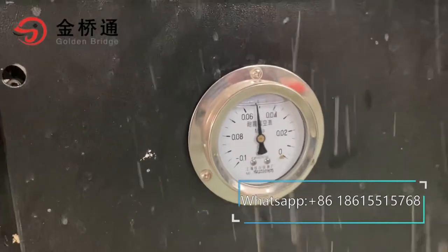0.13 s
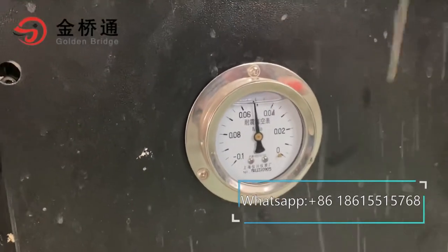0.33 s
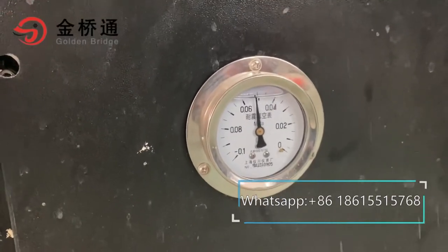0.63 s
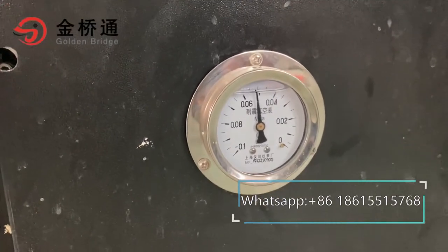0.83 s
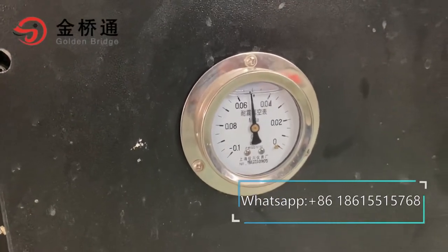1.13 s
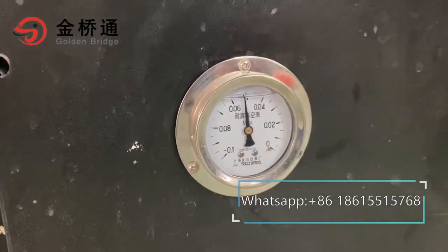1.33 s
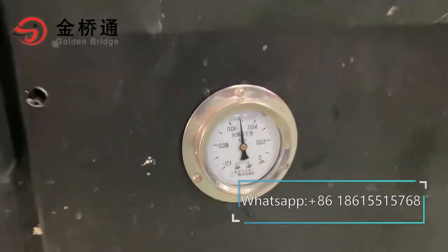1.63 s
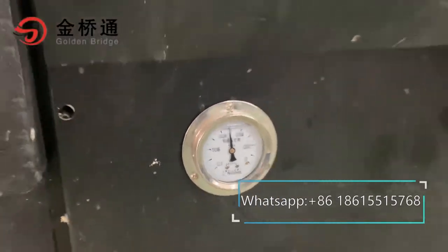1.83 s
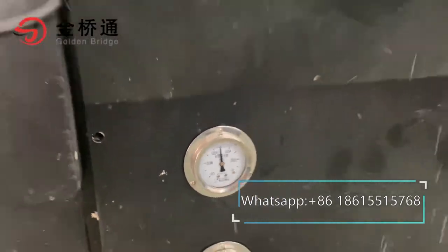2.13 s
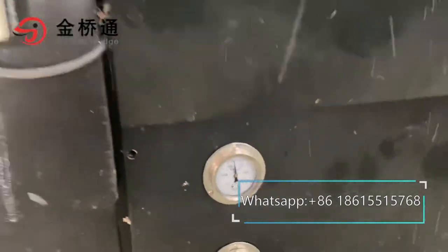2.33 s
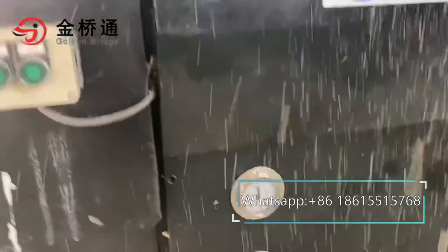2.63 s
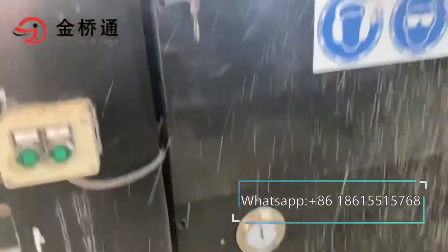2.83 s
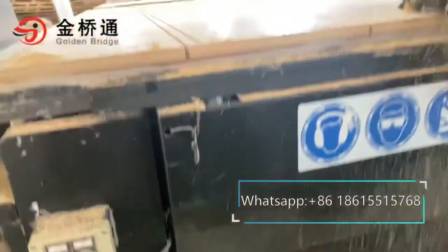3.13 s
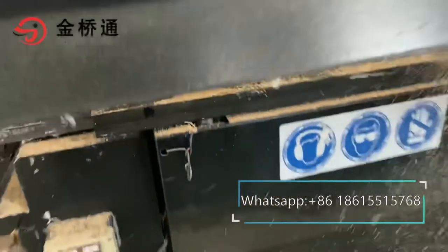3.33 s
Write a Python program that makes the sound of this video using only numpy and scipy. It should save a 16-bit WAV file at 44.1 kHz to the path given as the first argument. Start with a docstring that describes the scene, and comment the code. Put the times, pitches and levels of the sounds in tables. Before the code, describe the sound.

Steady machine roar in a workshop: rumbling pump, piercing spindle whine and raspy, hissing chip cutting.

```python
"""In a workshop, a vacuum pump rumbles beside a machine whose fast spindle throws chips.
Pump and spindle tones are sines with wavering reflections; the spindle's fan sings on its sixth multiple.
The electric drive whistles in thin lines over the rasp and hiss of the cut, which are shaped noise.
The microphone pair starts at the cabinet's gauge, then backs off and rises through loud spots of the tones."""
import sys
import numpy as np
from scipy import signal
from scipy.io import wavfile
from scipy.ndimage import uniform_filter1d

SR = 44100
rng = np.random.default_rng(int(sys.argv[2]) if len(sys.argv) > 2 else 0)


def inscribe(sig):
    """Save sig as 16-bit PCM at rate SR to the path in sys.argv[1].

    A 1-D sig is mono; a 2-D sig holds one channel per row.
    Samples are clipped to [-1, 1] before scaling.
    """
    pcm = np.round(np.clip(np.atleast_2d(sig).T, -1, 1) * 32767)
    wavfile.write(sys.argv[1], SR, pcm.astype(np.int16))


N = 154350

# The microphone pair. Each row: frequency in Hz, likeness of the two sides (0-1),
# lead of the left in radians, left minus right in dB.
MICROPHONE_PAIR = [(80, 0.94, -0.2, -1.4), (300, 0.89, -0.2, -1.4), (450, 0.42, -0.2, -0.2),
                   (650, 0.94, -1.1, -0.9), (800, 0.72, -1.6, -0.0), (930, 0.58, -2.6, -1.2),
                   (1080, 0.15, -2.9, -1.9), (1250, 0.42, 1.0, -6.6), (1550, 0.52, 0.4, -5.8),
                   (1900, 0.73, 0.2, -2.0), (2250, 0.65, -0.0, -1.6), (2700, 0.2, 1.4, 0.6),
                   (3600, 0.52, 0.1, 0.9), (4300, 0.56, 0.2, 1.1), (5200, 0.24, 0.5, 2.6),
                   (6500, 0.82, 0.0, -0.4), (7400, 0.46, -1.2, 0.8), (8400, 0.92, -3.2, 0.1),
                   (9100, 0.52, -4.7, -0.4), (10000, 1.0, -6.3, -0.0), (11100, 0.34, -7.6, -0.1),
                   (12100, 0.95, -9.4, 0.0), (13000, 0.2, -11.6, -0.2), (13800, 0.99, -12.6, -0.0),
                   (15000, 0.14, -14.3, -0.0), (15600, 0.93, -15.7, -0.0)]
# Spindle speed. Each row: time in seconds, turns per second.
SPINDLE_SPEED = [(0, 299.7), (1.6, 299.75), (2.2, 298.95), (2.7, 299.3), (3.1, 299.15), (3.5, 298.85)]
# Spectrum of the cutting hiss. Each row: frequency in Hz, dB per Hz before any level curve.
HISS_SPECTRUM = [(2500, -77), (3000, -66), (3300, -65.5), (3900, -66), (4400, -69.5), (5000, -70),
                 (6000, -72), (6400, -73), (7500, -72), (7950, -65.5), (8300, -77.5), (9800, -71.5),
                 (11800, -78.5), (12600, -88), (15600, -85), (17000, -108)]


def amp(db):
    """Decibels to gain."""
    return 10 ** (np.asarray(db) / 20)


def evened(x):
    """Scales to rms 1."""
    return x / np.sqrt(np.mean(abs(x) ** 2) + 1e-20)


def curve(points, t=None, axis=1):
    """One column of a time table, joined by straight lines."""
    table = np.transpose(points)
    if t is None:
        t = np.arange(N) / SR
    return np.interp(t, table[0], table[axis])


def read(points, hz):
    """All columns of a frequency table, joined by straight lines on a log axis."""
    f, *columns = np.transpose(points)
    return [np.interp(np.log(hz + 1), np.log(f + 1), column) for column in columns]


def drift(rate_hz, count=512):
    """Slow complex random wander of rms 1, its spectrum falling to half at rate_hz."""
    f = np.fft.fftfreq(count, N / SR / count)
    chance = rng.standard_normal(count) + 1j * rng.standard_normal(count)
    slow = np.fft.ifft(chance / (1 + (f / rate_hz) ** 2))
    return np.interp(np.linspace(0, count - 1, N), np.arange(count), evened(slow))


def sides(pan_db):
    """Left and right gains of constant power."""
    gains = np.array([amp(pan_db / 2), amp(-pan_db / 2)])
    return gains / np.sqrt((gains ** 2).mean(0))


def tone(hz, db, waver, rate_hz, place=None):
    """A line plus its wavering reflections at the two microphones; place = (balance dB, lead radians)."""
    if place is None:
        _, lead, balance = read(MICROPHONE_PAIR, np.mean(hz))
    else:
        balance, lead = place
    shared, apart = drift(rate_hz), drift(rate_hz)
    reflections = shared + 0.45 * np.array([apart, -apart])
    pair = (1 + waver * reflections) / np.sqrt(1 + waver ** 2)
    pair[0] *= np.exp(1j * lead)
    turns = np.cumsum(hz * np.ones(N)) / SR + rng.random()
    wave = (pair * np.exp(2j * np.pi * turns)).real
    return np.sqrt(2) * amp(db) * wave * sides(balance).reshape(2, -1)


def spot(usual_db, spots):
    """Level in dB as the microphone passes through loud spots (dB, s, half length s), added as power."""
    t = np.arange(N) / SR
    loud = sum(amp(db) ** 2 * np.exp(-abs((t - when) / half) ** 3) ** 2 for db, when, half in spots)
    return 10 * np.log10(amp(usual_db) ** 2 + loud)


def wash(spectrum, level, patchy_db, flicker_db, size):
    """Turbulent noise with drifting patches and a shared flicker, at the two microphones."""
    overlap = size - size // 4
    white = rng.standard_normal((2, N)) * np.sqrt(SR / 2)  # 0 dB per Hz
    hz, t, (a, b) = signal.stft(white, SR, nperseg=size, noverlap=overlap)
    same, lead, balance = read(MICROPHONE_PAIR, hz[:, None])
    same = np.clip(same, 0, 1)
    left = a * np.exp(1j * lead)
    right = same * a + np.sqrt(1 - same ** 2) * b
    pair = np.array([left, right]) * sides(balance)
    # patches spread over neighbouring pitches and moments; the flicker takes all pitches together
    patches = uniform_filter1d(rng.standard_normal(a.shape), size=5, axis=0)
    patches = evened(uniform_filter1d(patches, size=24, axis=1))
    flicker = evened(uniform_filter1d(rng.standard_normal(len(t)), size=3))
    level_db = read(spectrum, hz[:, None])[0] + curve(level, t)
    pair *= amp(level_db + patchy_db * patches + flicker_db * flicker)
    return signal.istft(pair, nperseg=size, noverlap=overlap)[1][:, :N]


def pump():
    """Beating low tones over the rumble, and the hollow roar of the cabinet."""
    # Each row: frequency in Hz, dB before the level curve.
    pump_tones = [(67.5, -45.5), (81, -53.5), (99.8, -39), (104, -43.5), (119, -42.5), (247, -45.5),
                  (328, -49)]
    # Each row: time in seconds, dB added to every pump tone.
    tone_level = [(0, -2.5), (.8, 3.5), (2.1, 0.5), (2.35, -4), (3.5, -4)]
    # Spectra of the rumble and the roar. Each row: frequency in Hz, dB per Hz before the level curve.
    rumble_spectrum = [(8, -102), (25, -85), (45, -81), (68, -51), (90, -53.5), (112, -52.5), (150, -54.5),
                       (200, -107.5)]
    roar_spectrum = [(140, -71), (185, -60), (280, -64.5), (330, -57.5), (450, -64.5), (540, -60),
                     (660, -50), (760, -62.5), (880, -63.5), (1150, -105)]
    # Their levels. Each row: time in seconds, dB added to the spectrum.
    rumble_level = [(0, -5), (.1, 0), (1.1, -3), (1.65, 1), (2.25, -2.5), (2.42, -9), (3.5, -17)]
    roar_level = [(0, 1.5), (0.8, -2), (1.2, 0), (1.9, 1.5), (2.15, 4), (2.5, -0.5), (2.85, -1.8),
                  (3.5, -3)]
    tones = sum(tone(hz, db + curve(tone_level), waver=0.36, rate_hz=6.3) for hz, db in pump_tones)
    rumble = wash(rumble_spectrum, rumble_level, patchy_db=1.8, flicker_db=1.5, size=2048)
    roar = wash(roar_spectrum, roar_level, patchy_db=1, flicker_db=0.5, size=2048)
    return tones + amp(-3.0) * rumble + roar


def spindle():
    """Multiples of the turning speed; the fan's blade tone is the loudest and shifts between microphones."""
    # The third multiple and the fan tone.
    # Each row: time in seconds, level in dB, left minus right in dB, lead of the left in radians.
    third_path = [(0, -54, 1.2, -1), (1.05, -48.5, 3, -2), (1.2, -36, 5.5, -3), (1.7, -30.5, -2, -2),
                  (1.85, -31.5, -1.4, -2.0), (1.93, -44, -5, -2.5), (2.05, -33.5, -1, -4),
                  (2.35, -28.5, 0.5, -3), (2.59, -51, 14, -2), (2.74, -54, 7, -3), (2.85, -38, -6.4, -5.5),
                  (3.1, -43.3, -5, -6), (3.35, -37.5, -3, -6), (3.5, -34.5, -2.5, -4.5)]
    fan_path = [(0, -25.8, 1.0, 1.4), (0.1, -24.8, -2.4, 1.1), (0.25, -24.0, -0.0, 1.0),
                (0.42, -25.1, 9.1, 1.1), (0.8, -23.9, 7.3, 0.7), (1.35, -22.9, 1.8, 1.1),
                (1.72, -26.1, 2.8, 1.1), (1.95, -22.3, 5.3, 0.9), (1.985, -24.8, 4.5, 2.4),
                (2.02, -21.4, 7.8, 0.6), (2.3, -18.1, -7.0, 0.6), (2.44, -18.3, -3.1, 0.1),
                (2.68, -22.2, -2.9, 0.2), (2.86, -17.5, -0.1, -0.4), (2.95, -21.5, -0.4, -0.7),
                (3.06, -33, -0.8, -1.1), (3.11, -28, 1.5, -1.2), (3.15, -30, 1.0, -1.2),
                (3.2, -23.7, -4.4, -0.8), (3.31, -23.2, -3.0, -0.4), (3.39, -31.6, -1.0, -0.6),
                (3.5, -29.8, -2.4, -0.5)]
    # First and second multiples, heard once clear of the cabinet. Each row: time in seconds, level in dB.
    first_level = [(0, -51), (1.95, -48), (1.99, -33), (2.3, -30), (2.55, -28), (2.85, -32), (2.92, -42),
                   (3.0, -32.5), (3.5, -41)]
    second_level = [(0, -59), (1.5, -43), (2.08, -42), (2.2, -27), (2.45, -28.5), (2.621, -25), (2.87, -27),
                    (2.94, -40), (3.08, -34.5), (3.16, -26), (3.5, -34.5)]
    # Higher multiples, a row for each loud spot. Each row: multiple of the speed, usual level in dB,
    # dB of the loud spot, its time in seconds, its half length in seconds.
    overtone_spots = [(4, -59, -37, 2.21, 0.27), (4, -68, -44.5, 3.25, 0.26), (5, -80, -34.5, 2.3, 0.46),
                      (5, -63, -40, 3.1, 1), (7, -46, -36, 2.65, 0.39), (7, -70, -34.5, 3.29, 0.34),
                      (8, -53.5, -42, 1.53, 0.28), (9, -51, -40.5, 1.8, 0.75), (12, -52, -36.5, 0.066, 0.6),
                      (12, -55, -39, 1.73, 0.13), (15, -71, -39, 1.77, 0.15),
                      (18, -54.5, -41.5, 1.43, 0.27), (18, -67, -38, 1.695, .14)]
    blades = 6
    speed = curve(SPINDLE_SPEED)
    sound = np.zeros((2, N))
    for multiple, path in [(blades // 2, third_path), (blades, fan_path)]:
        place = (curve(path, axis=2), curve(path, axis=3))
        sound += tone(multiple * speed, curve(path), waver=0.1, rate_hz=20, place=place)
    for multiple, level in [(1, first_level), (2, second_level)]:
        sound += tone(multiple * speed, curve(level), waver=0.17, rate_hz=14)
    for multiple, usual_db, *loud_spot in overtone_spots:
        sound += tone(round(multiple) * speed, spot(usual_db, [loud_spot]), waver=0.37, rate_hz=18)
    return sound


def drive():
    """The switched motor current makes thin whistles, some strong and many faint."""
    # Each row: rough frequency in Hz, usual dB before the level curve.
    strong_whistles = [(3367, -49), (3967, -47), (6568, -56), (6735, -47.5), (6901, -56), (7033, -51),
                       (7192, -57), (7334, -58), (7634, -54), (7768, -53), (7934, -43), (8091, -58),
                       (9889, -59), (10099, -58), (10401, -53), (10567, -56), (13937, -63)]
    # Loud spots the microphone passes through. Each row: the whistle's rough frequency in Hz,
    # dB before the level curve, time in seconds, half length in seconds.
    whistle_spots = [(3367, -41, .3, .25), (3367, -40, 1.15, .27), (3967, -35, .62, .32),
                     (6735, -40, 0, .07), (6735, -34.7, .5, .19), (6735, -40.5, .8, .16),
                     (6735, -38.5, 1.93, .18), (6735, -33, 2.25, .08), (6735, -41, 2.88, .2),
                     (6901, -47, 1.25, .14), (6901, -49, 2.5, .45), (7033, -45, 1.3, .22),
                     (7033, -39, 2.4, .14), (7192, -48, 1.6, .3), (7634, -47, 1.2, .15),
                     (7634, -44, 1.88, .12), (7634, -43, 2.3, .13), (7768, -41, 2.18, .08),
                     (7934, -41, .05, .1), (7934, -35.5, .5, .27), (7934, -37, 1.17, .25),
                     (7934, -33.5, 1.53, .11), (7934, -29, 1.75, .07), (7934, -38.5, 2.42, .22),
                     (8091, -41, 1.6, .2), (9889, -46, 1.7, .14), (10099, -50, 2.3, .3),
                     (10567, -50, 2.1, .5), (10401, -41.5, .21, .09), (10401, -40, .52, .19),
                     (10401, -38, 1.46, .075), (10401, -43, 1.85, .17), (10401, -36.3, 2.18, .17),
                     (10401, -42.5, 2.48, .1), (10401, -41, 2.94, .15), (13937, -57, 1.6, .4)]
    # Whistles weaken as the microphone rises. Each row: time in seconds, dB added to all whistles.
    whistle_level = [(0, .3), (2.98, .3), (3.2, -7), (3.5, -10)]
    sound = faint_whistles()
    for hz, usual_db in strong_whistles:
        own_spots = [row for pitch, *row in whistle_spots if pitch == hz]
        sound += tone(on_pattern(hz), spot(usual_db, own_spots), waver=0.17, rate_hz=4)
    return sound * amp(curve(whistle_level))


def faint_whistles(count=50):
    """Many weak lines of the drive, each fading in and out at random as the microphone moves."""
    lowest_hz, highest_hz = 3006, 15410
    over_hiss_db, fade_db = 2, 8  # over the hiss spectrum in one Hz; depth of the fading
    out, t = np.zeros((2, N)), np.arange(N) / SR
    for pitch, start in rng.random((count, 2)):
        hz = on_pattern(lowest_hz + pitch * (highest_hz - lowest_hz))
        db = read(HISS_SPECTRUM, hz)[0] + over_hiss_db + fade_db * drift(1.6).real
        phase = 2 * np.pi * (hz * t + start)
        lead = read(MICROPHONE_PAIR, hz)[1]
        out += amp(db) * np.cos([phase + lead, phase])
    return out


def on_pattern(hz):
    """The drive's switching pattern repeats steadily, so its whistles lie on multiples of that rate."""
    pattern_hz = 33.337
    return pattern_hz * np.round(hz / pattern_hz)


def cutting():
    """Rasp and hiss of chips and air, pulsing slightly with each turn."""
    # Spectrum of the rasp. Each row: frequency in Hz, dB per Hz before the level curve.
    rasp_spectrum = [(800, -83), (1000, -64), (1130, -68.5), (1350, -63.5), (1650, -62), (1880, -58),
                     (2000, -64), (2130, -59.5), (2530, -68.5), (2750, -62.5), (3300, -88)]
    # Levels of the rasp and the hiss. Each row: time in seconds, dB added to the spectrum.
    rasp_level = [(0, -3.5), (1.1, -2), (1.55, 0), (1.95, 1.5), (2.12, 5), (2.22, 3.5), (2.38, 2),
                  (2.95, 0.6), (3.2, -5), (3.5, -4)]
    hiss_level = [(0, -2.5), (1, -2.5), (1.5, 0.7), (1.95, 2), (2.09, 6.5), (2.209, 5.5), (2.36, 2.2),
                  (2.62, 0), (2.95, -0.6), (3.25, -5), (3.5, -5.5)]
    turns = np.cumsum(curve(SPINDLE_SPEED)) / SR
    pulse = 1 + 0.083 * np.cos(2 * np.pi * turns)
    rasp = wash(rasp_spectrum, rasp_level, patchy_db=1.85, flicker_db=1.5, size=1024)
    hiss = wash(HISS_SPECTRUM, hiss_level, patchy_db=1.62, flicker_db=0.7, size=512)
    return pulse * (rasp + hiss)


def scene():
    """Everything runs at once."""
    return pump() + spindle() + drive() + cutting()


def record(dry):
    """The recorder's band limit: a steep low-pass."""
    edge_hz = 15720
    low_pass = signal.firwin(511, edge_hz, window=("kaiser", 9), fs=SR)
    return signal.oaconvolve(dry, low_pass[None], "same")


dry = scene()
out = record(dry)
inscribe(out)
```